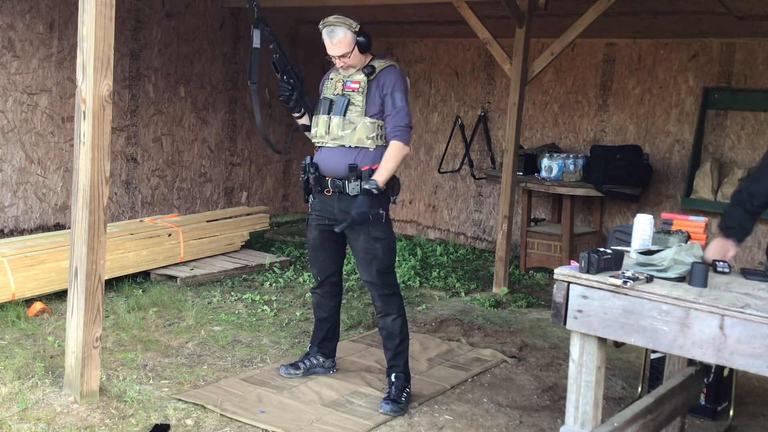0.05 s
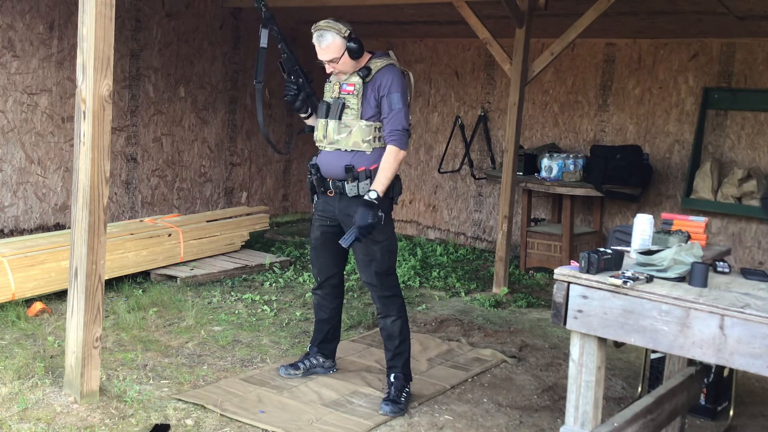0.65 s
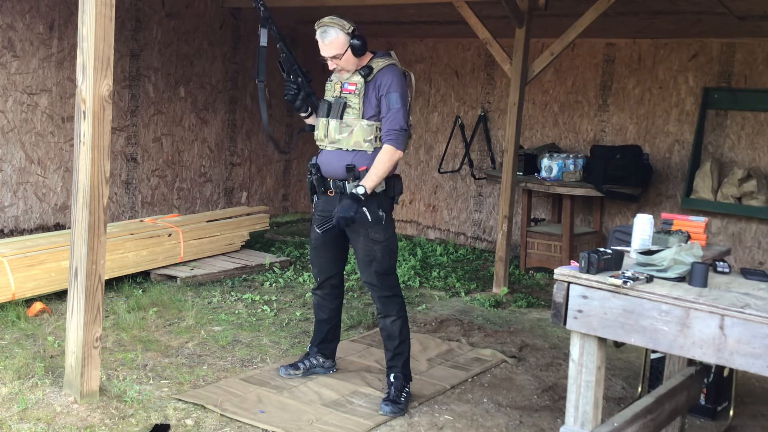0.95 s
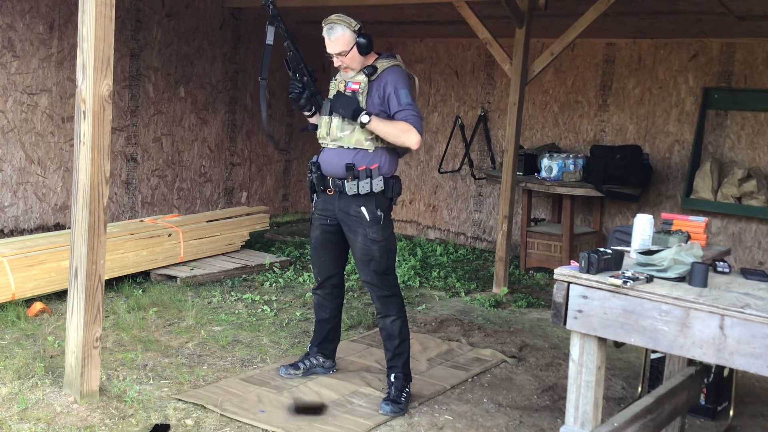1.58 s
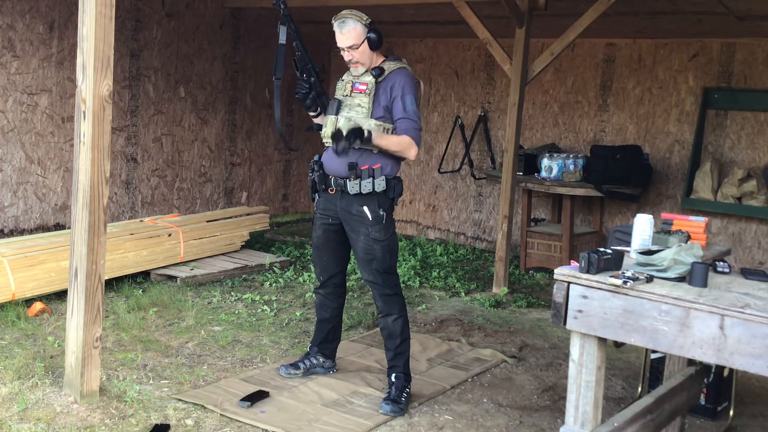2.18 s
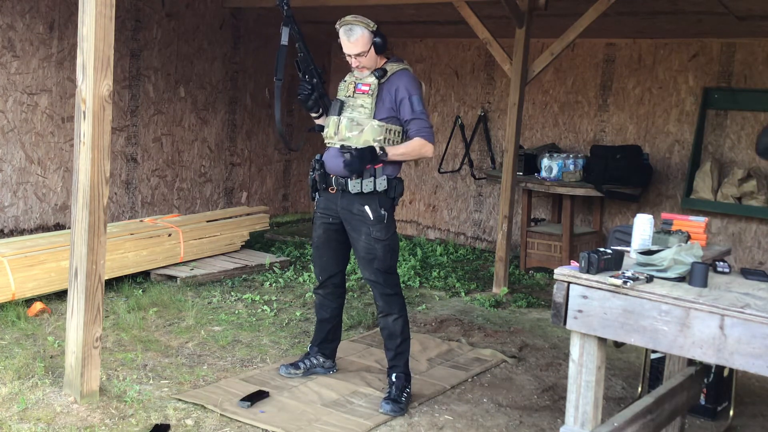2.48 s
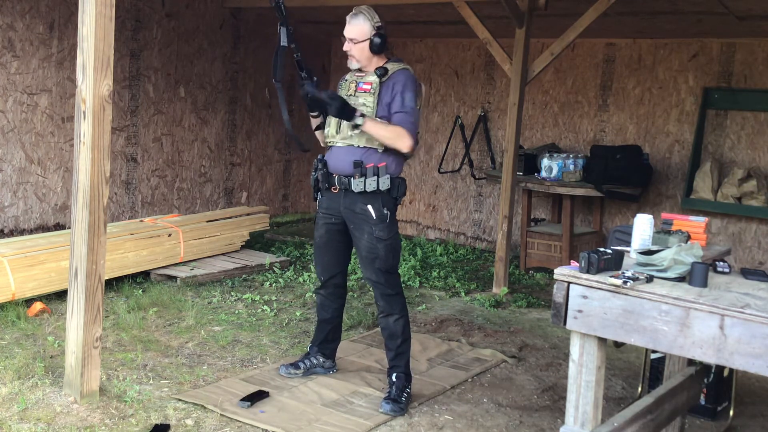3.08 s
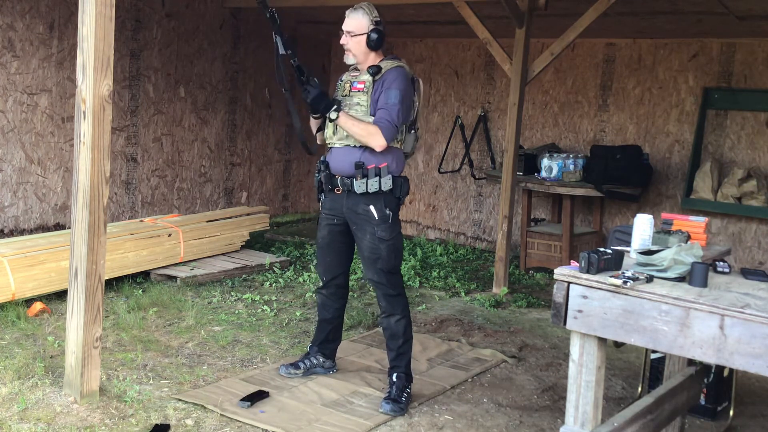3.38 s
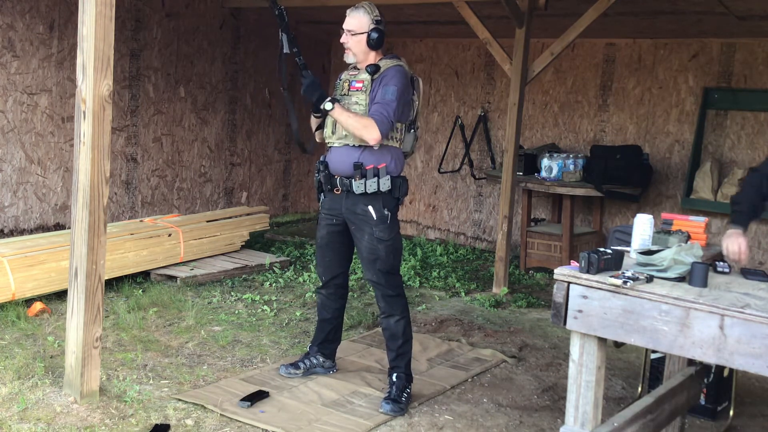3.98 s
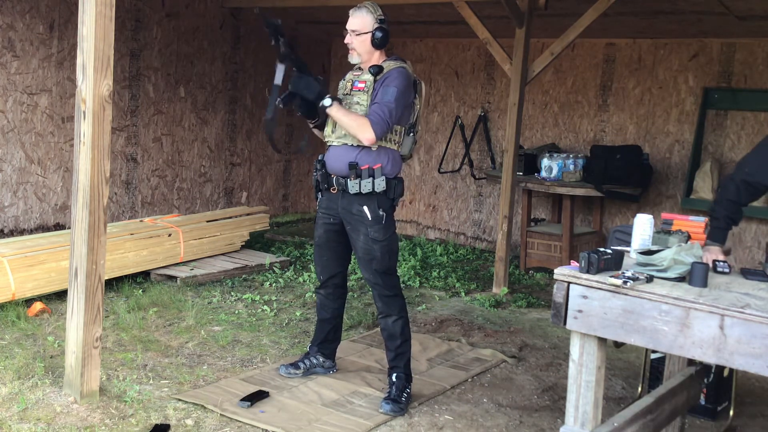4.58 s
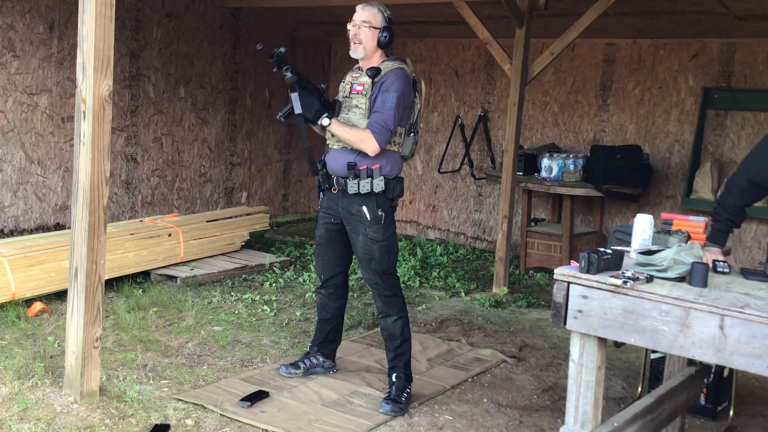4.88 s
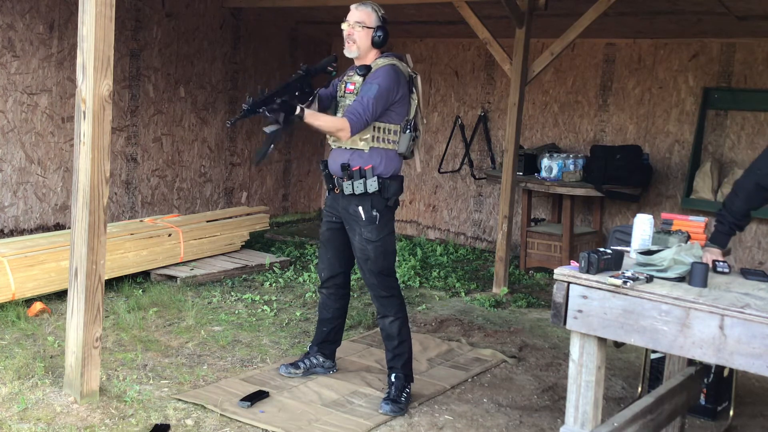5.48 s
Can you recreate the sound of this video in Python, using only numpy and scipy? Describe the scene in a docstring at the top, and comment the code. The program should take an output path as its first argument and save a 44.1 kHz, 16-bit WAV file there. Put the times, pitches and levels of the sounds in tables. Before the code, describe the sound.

Against quiet outdoor air and a far engine that soon fades, a rifle magazine is knocked out with a sharp clack and clatters onto a mat. Gear clicks and cloth rustles, then a full magazine taps around and seats with a hard double clack. The bolt is drawn back and snaps closed, the loudest sound, with a short spring buzz. Everything is heard from a few metres away, with a wooden shelter's short echo.

```python
"""A rifle is reloaded a few metres away, under a plywood range shelter. The empty magazine is knocked
free and lands on a mat; a fresh one is drawn, fumbled into the well and slapped home; the bolt is pulled
back and slams shut, and its spring shudders. Each contact is a burst of tiny impacts that excites the
resonant modes of a part, and the shelter adds echoes and a short reverberation. Clothes rustle by
friction, and a far engine hums at first over a quiet outdoor background."""
import sys
import numpy as np
from scipy import signal
from scipy.fft import rfft, irfft, next_fast_len
from scipy.io import wavfile
from scipy.ndimage import uniform_filter1d, map_coordinates

SR = 44100
rng = np.random.default_rng(int(sys.argv[2]) if len(sys.argv) > 2 else 0)


def to_wav(s):
    """Save 16-bit WAV."""
    ch = np.atleast_2d(s).T  # columns
    pcm = np.round(np.clip(ch, -1, 1) * 32767)  # PCM
    wavfile.write(sys.argv[1], SR, pcm.astype(np.int16))


N = 249165

# harmonics of the engine: (multiple of the turning rate [1], relative level [dB])
ENGINE_ORDERS = [(2, -13), (3, -4), (4, -1), (6, -15)]
# sleeves and vest rub: (middle [s], half length [s], level [dB])
RUBS = [(0.102, 0.24, -77.5), (0.409, 0.037, -66.5), (2.929, 0.028, -75.5), (3.141, .02, -70),
        (3.959, 0.027, -69), (4.522, 0.042, -67), (4.712, 0.031, -71.5), (5.388, 0.048, -69.5)]
# glove and magazines slide over the gear: (middle [s], half length [s], level [dB], band centre [Hz])
SLIDES = [(.863, 0.035, -78, 2480), (1.522, 0.029, -71.5, 4000), (1.766, .019, -71, 9000),
          (1.794, .022, -63, 2540), (3.422, 0.02, -64, 6450), (4.024, .007, -57.5, 4870)]
# hand and rifle bump against the body: (time [s], level [dB])
BUMPS = [(3.565, -63.5), (4.556, -64), (5.064, -48.5), (5.583, -64)]

# light knocks: (time [s], level [dB], bass gain [dB], treble gain [dB])
POUCH_HITS = [(1.4545, -60.5, 17, -7), (2.405, -45.5, 1, -7.5), (2.4755, -43.5, 5.5, -2),
              (2.6315, -55.5, -2.5, -4.5), (2.6437, -43.5, -20, 0.5)]
FULL_HITS = [(3.3245, -42.5, 1, 2.5), (3.6425, -38, 5.5, 1.5), (3.7332, -39.5, 0, 2), (3.902, -52.5, 0, -3),
             (4.178, -51.5, -19, -4), (4.3665, -46.5, -4.5, 3.5)]
# the empty magazine is knocked free, then lands on each end in turn: # (time [s], level [dB], bass gain [dB],
# treble gain [dB], rattle t60 [s], far-end slap gain [dB])
EMPTY_HITS = [(1.5452, -25.5, -1.5, -1.5, 0.062, -4), (1.560, -24.5, -4, -3.5, 0.018, -9),
              (1.8365, -35, -1.5, -4, 0.039, -2), (1.866, -43, -4, -11.5, 0.049, 4)]
# hard blows: (time [s], level [dB], bass gain [dB], treble gain [dB], rattle t60 [s])
SEAT_HITS = [(4.0296, -27.5, 0, 9.5, 0.042), (4.0543, -24.5, -2.5, 0, 0.024)]
HANDLE_HITS = [(4.874, -65, -3, 26.5, 0.042), (4.9473, -36.5, -1, 9, 0.032), (4.965, -31.5, -4, -11, 0.071),
               (4.984, -40, 10, -7.5, 0.074), (4.996, -33, -0.5, -4.5, 0.17)]
BOLT_HITS = [(5.029, -25, 0, 9.5, .07), (5.0342, -19.5, -0.5, 3.5, 0.02)]
# spells of loose ticking, by part: (start [s], length [s], level [dB])
JIGGLES = {"empty": [(1.90, .04, -52.5), (1.986, 0.11, -54.5)], "full": [(3.889, .075, -55.5),
           (4.549, .05, -60.5)], "rifle": [(5.16, 0.16, -58), (5.521, 0.038, -69), (5.567, .03, -64.5)]}

# resonances of each part: (frequency [Hz], bandwidth [Hz], level over its broad spectrum [dB])
POUCH_MODES = [(600, 60, 8.2), (1730, 200, 11), (2192, 110, 16), (3200, 150, 7), (3570, 130, 4.5),
               (6400, 740, 1.9)]
EMPTY_MODES = [(119, 23, 7), (330, 62, 6), (632.5, 34, 7.5), (826, 60, 1.5), (1033, 100, 1.5),
               (1526, 83, 6), (3150, 55, 1.5), (4304, 400, 7.5), (4820, 90, 2.5), (5350, 230, 5.5)]  # the one near 330 Hz is the shelter's low boom, a room mode
FULL_MODES = [(556, 76, 6.6), (745, 80, 4), (1430, 100, 5), (1716, 100, 7.5), (2124, 97, 10.7),
              (4230, 680, 1.8)]
WELL_MODES = [(1730, 130, -5), (2080, 240, 2.5), (2740, 100, 4), (3076, 130, 3.5), (3900, 230, -4.5),
              (4800, 190, 7), (9150, 160, 7)]
HANDLE_MODES = [(1430, 90, 11.6), (1680, 79, 16), (1917, 90, 9), (2680, 70, 4), (3800, 150, 4.4),
                (7430, 310, 3.3)]
BOLT_MODES = [(1480, 63, 5.6), (1828, 87, 9.8), (2023, 110, 8.1), (2790, 55, 3.5), (3455, 180, 4.5),
              (3790, 130, 10), (4270, 120, 6.8), (4640, 120, 1.7), (5800, 53, 3.3), (6154, 52, 4.9),
              (7450, 160, 0.83), (10620, 45, 4.6)]
# broad spectrum of each source: (frequency [Hz], relative spectral density [dB])
AIR_SPECTRUM = [(15, -43), (25, -11.5), (137, -2.5), (170, -8), (270, -11), (344, -11), (476, -19.5),
                (775, -19), (887, -24), (1790, -26), (2480, -29), (4870, -31), (6380, -36), (16000, -41)]
POUCH_SPECTRUM = [(50, -29.5), (250, -14), (900, -9), (1500, -3), (2700, -4), (5000, -4), (8000, -9.5),
                  (16000, -18.5)]
EMPTY_SPECTRUM = [(35, -36.5), (75, -7.5), (130, -1.5), (290, -1), (450, -6.5), (800, 4), (2000, -3.5),
                  (3500, -5.5), (7000, -3), (11000, -6), (16000, -10)]
FULL_SPECTRUM = [(50, -35), (250, -19.5), (450, -15.5), (900, -8.5), (1500, -2), (2700, -1), (5000, -5.5),
                 (8000, -9), (16000, -20.5)]
WELL_SPECTRUM = [(50, -34.5), (250, -7.5), (480, -6.5), (800, -2), (1400, 1), (3000, 3), (6000, -1),
                 (10000, -6.5), (16000, -6)]
HANDLE_SPECTRUM = [(50, -37), (250, -22), (600, -7.5), (1300, -5), (3000, 0), (6000, 2.5), (9000, -6),
                   (16000, -8)]
BOLT_SPECTRUM = [(50, -40), (160, -23), (270, -4.5), (450, -10.5), (1200, -0.5), (3000, -0.5), (6000, 2.5),
                 (9000, -6.5), (16000, -14)]
SPRING_SPECTRUM = [(1500, -26), (2800, -13), (3800, -11.5), (5000, -1), (6300, 1.5), (7300, -15.5),
                   (10000, -20), (16000, -31.5)]

# reflections off roof and walls: (delay [s], gain [dB])
ECHOES = [(.0095, -18), (.022, -16), (.036, -15.5)]
# reverberation time of the shelter: (frequency [Hz], t60 [s])
REVERB_T60 = [(150, 0.62), (400, 0.41), (1000, 0.38), (2700, 0.31), (6000, .31), (9000, .26), (15000, 0.16)]
# colour of the reverberation: (frequency [Hz], relative level [dB])
REVERB_SPECTRUM = [(200, -1.5), (600, 3), (1100, 1), (1550, 2), (2100, -2.5), (3000, 1), (6000, -6),
                   (10000, -3), (16000, -6)]


def amp(db):
    """Amplitude grows tenfold for every 20 dB."""
    return 10 ** (np.asarray(db) / 20)


def unit(x):
    """Normalisation to an rms of 1."""
    return x / np.sqrt(np.mean(x ** 2) + 1e-20)


def along(points, hz):
    """Interpolation of (frequency, value) points on a logarithmic frequency axis."""
    freqs, values = np.transpose(points)
    return np.interp(np.log(hz + 1), np.log(freqs), values)


def wobble(rate, size=N):
    """Smooth random modulation: a spline through rate knots a second."""
    knots = rng.standard_normal(int(size * rate / SR) + 4)
    return map_coordinates(knots, [np.arange(size) * rate / SR])


def filtered(x, gain):
    """Zero-phase filtering: the spectrum is multiplied by gain(frequency)."""
    size = next_fast_len(len(x) + SR // 10)
    return irfft(rfft(x, size) * gain(np.fft.rfftfreq(size, 1 / SR)), size)[:len(x)]


def minimum_phase(gain):
    """Folding the cepstrum turns a magnitude response into a causal impulse response."""
    cepstrum = irfft(np.log(np.maximum(gain, 1e-6)))
    half = len(cepstrum) // 2
    cepstrum[1:half] *= 2
    cepstrum[half + 1:] = 0
    return irfft(np.exp(rfft(cepstrum)))


def add(track, s, sound):
    """Superposition of a sound on the track from time s."""
    part = track[max(round(s * SR), 0):][:len(sound)]
    part += sound[:len(part)]


def shelter(sound, wet_db, build_s=.0075):
    """Reverberation: discrete reflections and a diffuse tail, coloured by plywood, follow the sound."""
    hz, t, bands = signal.stft(rng.standard_normal(SR // 2), SR, nperseg=256)
    decay_db = 60 * t / along(REVERB_T60, hz)[:, None]
    tail = signal.istft(bands * amp(along(REVERB_SPECTRUM, hz)[:, None] - decay_db), SR, nperseg=256)[1]
    tail *= 1 - np.exp(-(np.arange(len(tail)) / SR / build_s) ** 2)
    response = amp(wet_db) * tail / np.linalg.norm(tail)
    response[0] += 1  # direct path
    for delay, db in ECHOES:
        response[round(delay * SR)] += amp(db)
    return signal.fftconvolve(sound, response)


def air(level_db=-69):
    """Ambient noise outdoors is broadband: a soft rumble under a faint, even hiss."""
    noise = filtered(rng.standard_normal(N), lambda hz: amp(along(AIR_SPECTRUM, hz)))
    return amp(level_db + .2 * wobble(5.3)) * unit(noise)


def engine(turn_hz=37.1, drift=.0097, peak_db=-64.5, peak_s=.42, fade_s=1.42):
    """A far engine radiates harmonics of its wavering turning rate; only a few low orders carry."""
    phase = 2 * np.pi * np.cumsum(turn_hz * (1 + drift * wobble(9.8))) / SR
    hum = sum(amp(db + .89 * wobble(4)) * np.sin(order * phase + rng.uniform(0, 2 * np.pi))
              for order, db in ENGINE_ORDERS)
    t = np.arange(N) / SR
    swell_db = np.minimum(34 * (t - peak_s), -5.5 * (t - peak_s))  # quick rise, slow sag
    fade_db = 20 * np.maximum(t - fade_s, 0)
    return unit(hum) * amp(peak_db + swell_db - fade_db)


def strokes(cloth_hz=605, fibre_hz=2500, fibre_db=-7.5, bump_half_s=.011, bump_hz=295):
    """Noise bands, laid out as SLIDES: a rub is a swish with a weaker fibre hiss, a bump a dull pulse."""
    swishes = [(s, half, db, cloth_hz) for s, half, db in RUBS]
    fibres = [(s, half, db + fibre_db, fibre_hz) for s, half, db in RUBS]
    bumps = [(s, bump_half_s, db, bump_hz) for s, db in BUMPS]
    return swishes + fibres + bumps + list(SLIDES)


def rustle(grain_db=3, scuff_db=3, q=.64):
    """Friction of cloth and gear gives swells of band-limited noise that catch in small scuffs."""
    track, t = np.zeros(N), np.arange(SR // 2) / SR
    middle = t.mean()
    for s, half, db, centre_hz in strokes():
        grip_db = grain_db * wobble(300, len(t)) + scuff_db * wobble(60, len(t))
        grains = rng.standard_normal(len(t)) * amp(grip_db)
        rub = filtered(grains, lambda hz: 1 / (1 + (q * (hz / centre_hz - centre_hz / (hz + 1))) ** 2))
        swell = np.exp(-((t - middle) / half) ** 2 / 2)
        stroke = amp(db) * unit(rub * swell) * np.sqrt(np.mean(swell ** 2))
        early = max(round((middle - s) * SR), 0)  # samples before time zero
        add(track, s - middle, shelter(stroke, wet_db=-13.5)[early:])
    return track


def chatter(t, t60, rise_s, spikiness=.19):
    """Contact force: a decaying burst of tiny impacts, whitened to a nearly flat spectrum."""
    envelope = (1 - np.exp(-t / rise_s)) * amp(-60 * t / t60)
    force = envelope * rng.standard_normal(len(t)) * np.exp(spikiness * rng.standard_normal(len(t)))
    spectrum = rfft(force)
    smoothed = np.sqrt(np.abs(uniform_filter1d(np.abs(spectrum) ** 2, size=90)) + 1e-12)
    return irfft(spectrum * rfft(minimum_phase(1 / smoothed)))


def contacts(hits, spectrum, modes, rise_s, wet_db, bass_hz=900, treble_hz=4500, size=8192):
    """Modal excitation: each contact force rings the given resonances; hits are as in SEAT_HITS."""
    hz, t = np.fft.rfftfreq(size, 1 / SR), np.arange(size) / SR
    bass = 1 / (1 + (hz / bass_hz) ** 4)
    treble = 1 - 1 / (1 + (hz / treble_hz) ** 3)
    track = np.zeros(N)
    for s, db, bass_db, treble_db, t60 in hits:
        # every point of contact excites the modes at new strengths
        peaks = sum(amp(mode_db + rng.standard_normal()) ** 2 / (1 + (2 * (hz - mode_hz) / width) ** 2)
                    for mode_hz, width, mode_db in modes)
        # a heavy blow adds bass, a hard edge adds treble
        colour = np.sqrt(1 + peaks) * amp(along(spectrum, hz) + bass_db * bass + treble_db * treble)
        clack = signal.fftconvolve(chatter(t, t60, rise_s), minimum_phase(colour))[:size]
        clack *= amp(db) * np.sqrt(.008 * SR) / np.linalg.norm(clack)  # energy of 8 ms at that level
        add(track, s, shelter(clack, wet_db))
    return track


def pouch(t60=.017):
    """Light impacts die quickly: glove and full magazine click against the pouch."""
    hits = [(*hit, t60) for hit in POUCH_HITS]
    return contacts(hits, POUCH_SPECTRUM, POUCH_MODES, rise_s=.0017, wet_db=-10.5)


def empty_magazine(touch_s=.0046, slap_delay_s=.0085):
    """Impact: a soft touch leads each blow, and the magazine's far end slaps down just after."""
    hits = []
    for s, db, bass_db, treble_db, t60, slap_db in EMPTY_HITS:
        hits += [(s - touch_s, db - 17, bass_db + 12.5, treble_db, t60 / 2),
                 (s, db, bass_db, treble_db, t60),
                 (s + slap_delay_s, db + slap_db, bass_db - 3, treble_db + 6, t60)]
    hits += jiggle(JIGGLES["empty"], bass_db=-1, treble_db=-12, t60=.13, fade_db=8)
    return contacts(hits, EMPTY_SPECTRUM, EMPTY_MODES, rise_s=.0006, wet_db=-10)


def jiggle(spells, bass_db, treble_db, t60, fade_db, scatter=.11, count=4):
    """Dissipation brings a loose part to rest in a few uneven ticks that fade over each spell."""
    hits = []
    for s, length, db in spells:
        for k, (lag, stray_db) in enumerate(rng.standard_normal((count, 2))):
            age = (k + scatter * lag * (k > 0)) / count
            hits.append((s + length * age, db - fade_db * age + stray_db, bass_db, treble_db, t60))
    return hits


def full_magazine(knock_t60=.022):
    """Knocks against the well excite the full magazine's modes as it is lined up and later tugged."""
    hits = [(*hit, knock_t60) for hit in FULL_HITS]
    hits += jiggle(JIGGLES["full"], bass_db=12, treble_db=-3.5, t60=.04, fade_db=7.5)
    return contacts(hits, FULL_SPECTRUM, FULL_MODES, rise_s=.0054, wet_db=-7.5)


def with_echoes(hits, loss_db, treble_step_db, t60_ratio, delay_s=.0086):
    """Reflection: two quick, weaker echoes off the shelter follow the last blow."""
    s, db, bass_db, treble_db, t60 = hits[-1]
    echoes = [(s + delay_s * k ** 1.4, db - loss_db * np.sqrt(k), bass_db,
               treble_db + treble_step_db * k, t60 * t60_ratio ** k) for k in (1, 2)]
    return list(hits) + echoes


def magazine_seating():
    """Two impacts set the well resonating: the magazine catches, then bottoms out."""
    hits = with_echoes(SEAT_HITS, loss_db=6.5, treble_step_db=-4.5, t60_ratio=1.13)
    return contacts(hits, WELL_SPECTRUM, WELL_MODES, rise_s=.00026, wet_db=-9.5)


def charging_handle():
    """A train of impacts rings the handle's modes as it unlatches and draws the bolt back."""
    return contacts(HANDLE_HITS, HANDLE_SPECTRUM, HANDLE_MODES, rise_s=.0005, wet_db=-8.5)


def bolt():
    """Hard impacts excite high modes: the bolt strips a round and slams shut, and loose parts tick."""
    hits = with_echoes(BOLT_HITS, loss_db=10.5, treble_step_db=3.3, t60_ratio=2.1)
    hits += jiggle(JIGGLES["rifle"], bass_db=-10, treble_db=-6.5, t60=.027, fade_db=6)
    return contacts(hits, BOLT_SPECTRUM, BOLT_MODES, rise_s=.00068, wet_db=-10.5)


def recoil_spring(start_s=5.04, level_db=-38, shudder_db=2, t60=.36):
    """Damped free vibration: the spring shudders on after the bolt has closed."""
    track, t = np.zeros(N), np.arange(SR // 2) / SR
    coils = unit(filtered(rng.standard_normal(len(t)), lambda hz: amp(along(SPRING_SPECTRUM, hz))))
    add(track, start_s, coils * amp(level_db + shudder_db * wobble(90, len(t)) - 60 * t / t60))
    return track


def scene():
    """Sound pressures add linearly: background, clothing and rifle sum to one channel."""
    magazines = pouch() + empty_magazine() + full_magazine() + magazine_seating()
    action = charging_handle() + bolt() + recoil_spring()
    return (air() + engine() + rustle() + magazines + action)[None]


def record(dry, low_cut_hz=42, high_cut_hz=16000):
    """Band limiting: a high-pass removes the deep bass and a steep low-pass the highest treble."""
    thinned = filtered(dry[0], lambda hz: 1 / np.hypot(1, (low_cut_hz / (hz + 1)) ** 4))
    return filtered(thinned, lambda hz: 1 / np.hypot(1, (hz / high_cut_hz) ** 90))[None]


dry = scene()
out = record(dry)
to_wav(out)
```